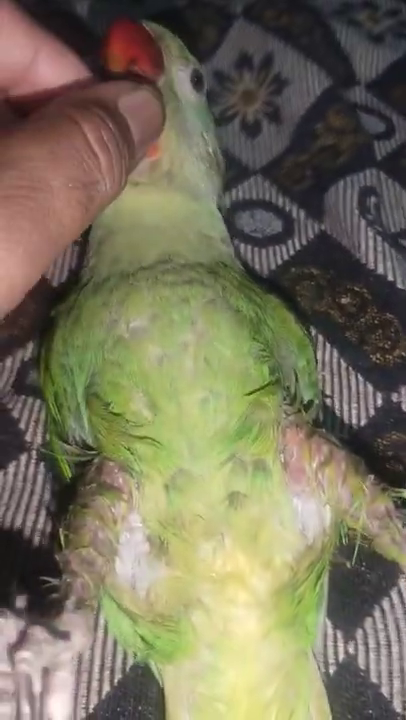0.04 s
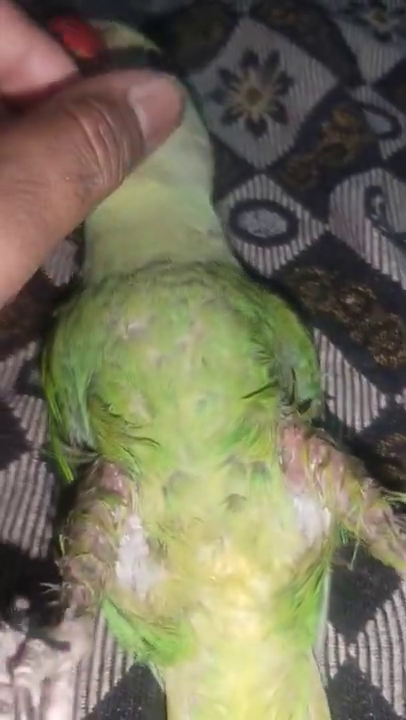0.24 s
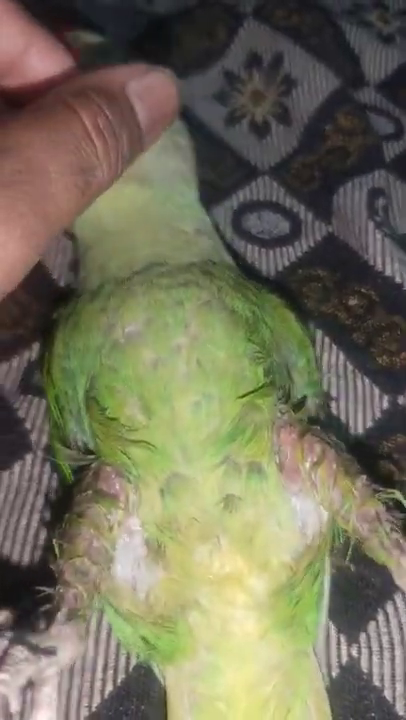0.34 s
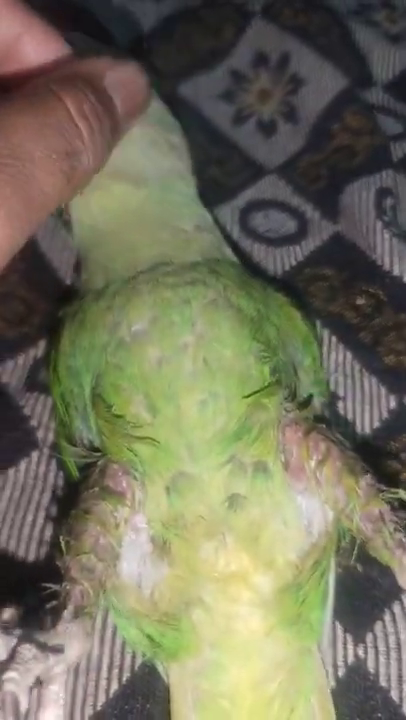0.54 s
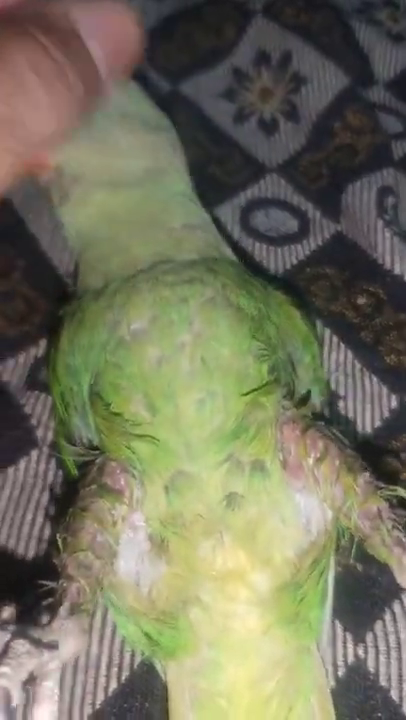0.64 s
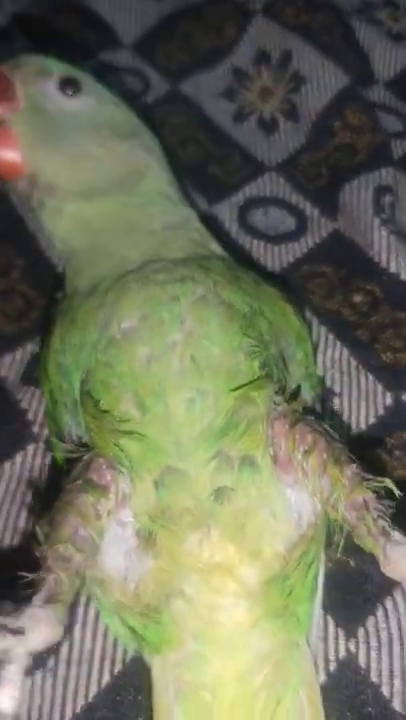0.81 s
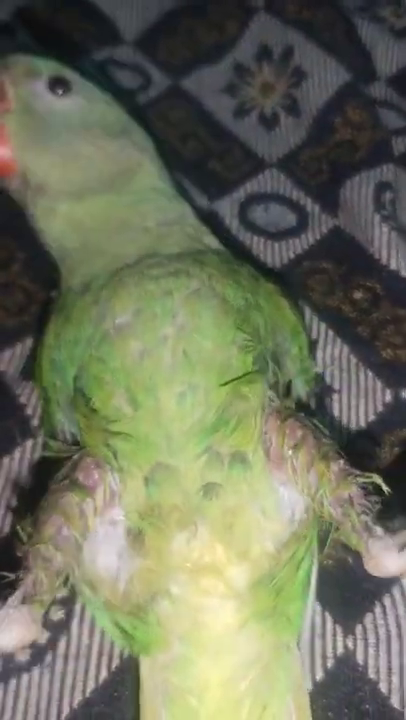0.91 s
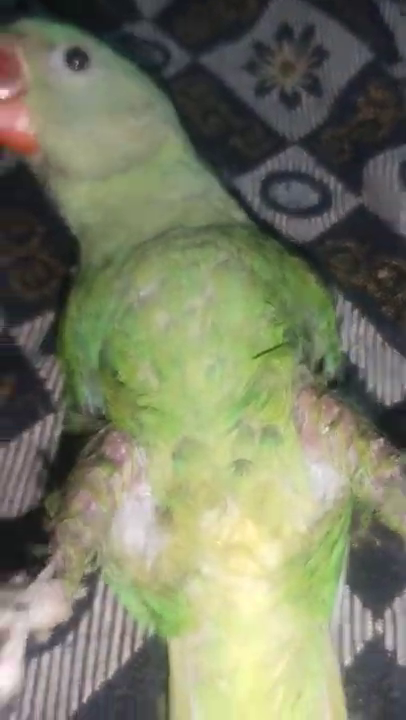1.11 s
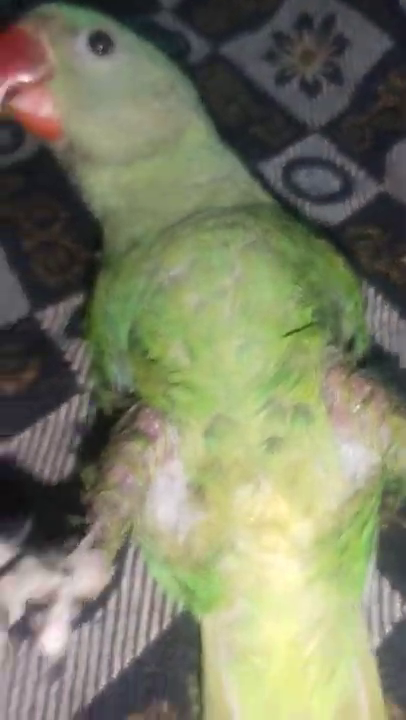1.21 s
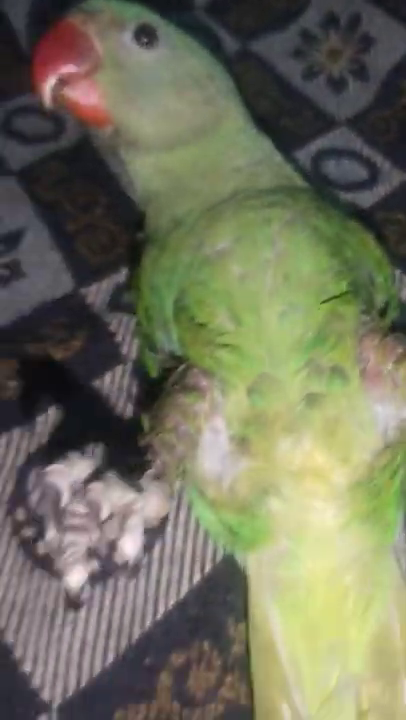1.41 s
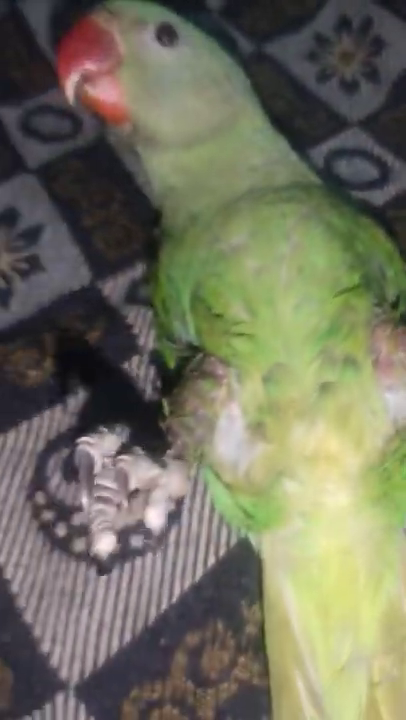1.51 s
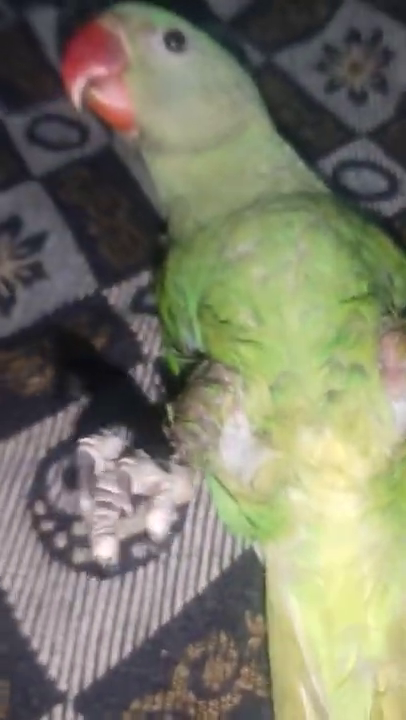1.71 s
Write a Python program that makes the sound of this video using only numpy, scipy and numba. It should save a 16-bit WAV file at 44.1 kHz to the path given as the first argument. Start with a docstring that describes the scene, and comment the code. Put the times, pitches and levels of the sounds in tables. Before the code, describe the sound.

A young parrot gives one harsh, high squawk that warbles rapidly and sinks slightly in pitch. It is close to the microphone in a small room, with low hum and soft handling bumps, and faint feather rustles afterwards.

```python
"""In a small room, a young parrot held close to a phone gives one harsh squawk.
Its syrinx is the source: a high tone that warbles about 27 times a second, sweeping its overtones
through the fixed resonances of the throat. Reflections from the room smear the sweeps.
Behind it lie rumble, a fan-like hum, soft handling bumps and, later, feather rustles and a faint whistle.
The phone's gain control turns them down along with the bird while the call lasts."""
import sys
import numpy as np
from scipy import signal
from scipy.fft import rfft, irfft
from scipy.io import wavfile
from scipy.ndimage import uniform_filter1d
from numba import njit

SR = 44100
rng = np.random.default_rng(int(sys.argv[2]) if len(sys.argv) > 2 else 0)


def log_audio(samples):
    """Write samples as a 16-bit WAV file to the path given in sys.argv[1]."""
    # one column per channel
    frames = np.atleast_2d(samples).T
    # limit to full scale, then quantise
    limited = np.clip(frames, -1, 1)
    pcm = np.round(limited * 32767).astype(np.int16)
    wavfile.write(sys.argv[1], SR, pcm)


N = 77175
TIME_S, FREQ_HZ = np.arange(N) / SR, np.fft.rfftfreq(N, 1 / SR)
SIDES = np.array([[1], [-1]])  # left, right

# spectrum of the background rumble and air: frequency_hz, relative_db
AIR_SPECTRUM = [(18, -76), (30, -39.5), (85, -5), (171, -3.5), (288, -12), (374, -6), (567, -13),
                (1270, -13), (1410, -25), (1870, -22), (2700, -33.5), (3070, -37), (3980, -34), (4310, -40),
                (15000, -63.5)]
# its stereo spread: frequency_hz, correlation, left_minus_right_db
AIR_SPREAD = [(62, 0.56, -17.5), (134, 0.45, -5), (300, 1, 3.5), (600, 0.091, 1.5), (1340, -0.52, 0.5),
              (3100, 0.31, 2), (8000, 0.12, 5)]
# bumps on the phone: centre_s, half_length_s, level_db
BUMPS = [(.06, 0.076, -42.5), (.28, 0.05, -35), (.38, 0.04, -32.5), (.56, 0.03, -30), (.65, 0.042, -34),
         (.8, 0.036, -29), (1.09, 0.032, -41.5), (1.47, 0.027, -43)]
# speed of the warble: time_s, rate_hz
WARBLE_RATE = [(.23, 23.54), (.29, 27.87), (.42, 27.8), (.6, 26.23), (.8, 25.76), (.92, 24.1)]
# top of the pitch swings: time_s, pitch_hz
CREST_PITCH = [(.21, 1940), (.25, 2262), (.281, 2388), (.288, 3170), (.298, 2900), (.309, 2322),
               (.317, 2391), (.323, 2932), (.332, 2900), (.348, 2334), (.395, 2273), (.5, 2087),
               (.77, 1840), (.89, 1655), (.94, 1561)]
# bottom of the pitch swings: time_s, pitch_hz
TROUGH_PITCH = [(.228, 1362), (.27, 1603), (.305, 1580), (.41, 1380), (.49, 1303), (.75, 1218), (.91, 1190),
                (.945, 1076)]
# skew of a swing (early ones rise slowly, late ones sink slowly): time_s, skew_rad
SWING_SKEW = [(.23, -0.098), (.31, -0.17), (.4, 0.076), (.6, .14), (.78, .2), (.9, 0.3024)]
# flatness of the crests: time_s, exponent
CREST_FLATNESS = [(.23, 0.86), (.28, 2.76), (.32, 2.9), (.36, 2.1), (.45, 1.6), (.55, 1), (.7, 1.08),
                  (.9, 0.97)]
# vocal effort: time_s, level_db
EFFORT = [(.215, -26.5), (.232, -25), (.243, -20), (.256, -25.5), (.264, -12), (.275, -9.5), (.286, -22),
          (.295, -3.5), (.311, -5.5), (.32, -9.5), (.328, 2.5), (.338, 2), (.42, 5), (.6, 3.5), (.76, 3.5),
          (.86, 1.3), (.94, -3.5)]
# loss of level on the upward sweeps: time_s, drop_db
RISE_SAG = [(.3, -1.5), (.55, 1), (.72, 3.5), (.8, 6), (.92, 2)]
# harmonics of the syrinx: multiple, level_db, phase_roughness_rad
HARMONICS = [(1, 4.76, .02), (2, -0.5, 0.02), (3, -7.5, 0.18), (4, -14.5, 0.26), (5, -13.5, .8),
             (6, -18.5, 0.55)]
# spectrum of the rasp at the syrinx: frequency_hz, relative_db
RASP_SPECTRUM = [(600, -38), (1150, -34), (1600, -7), (2500, -4.5), (4500, 8.5), (7000, 10.5), (9000, 4),
                 (11000, 9.5), (15000, 5)]
# strength of the open beak's shrill resonance: time_s, gain_db
BEAK_GAIN = [(.23, -33), (.6, -15), (.76, -22), (.86, 6), (.94, -5)]
# resonances of throat and beak at each microphone: frequency_hz, left_db, right_db
THROAT_RESPONSE = [(840, -37, -38), (1100, -13, -17), (1224, -17, -18.5), (1588, -15, -17),
                   (1857, -49, -5.5), (2050, -8, -6.5), (2290, -12.5, -0.5), (2310, -5.5, -2),
                   (2780, -5, -1.5), (3194, -10, -7), (3910, -7.5, 1.5), (4260, -10, -8), (4910, -8, -6),
                   (5900, -21, -12.5), (6380, -8.5, -8.5), (7560, -26.5, -15.5), (8050, -21.5, -41.5),
                   (8630, -37, -16.5), (11200, -37, -39), (15500, -27, -27.5)]
# feather rustles: centre_s, half_length_s, level_db
RUSTLES = [(1.3, 0.071, -48.5), (1.395, 0.023, -51.5), (1.66, .035, -53), (1.694, .006, -49.5)]
# their spectrum: frequency_hz, relative_db
RUSTLE_SPECTRUM = [(500, -16), (1000, 9.5), (2000, 2), (4000, -7), (7000, -11), (10000, -26), (15000, -25)]


def undb(db):
    """Decibels to amplitude ratio."""
    return 10 ** (np.asarray(db) / 20)


def curve(table):
    """Linear interpolation of (time_s, value) rows at every sample."""
    return np.interp(TIME_S, *np.array(table, float).T)


def spectrum(table, column=1):
    """One column of a table, interpolated over log frequency."""
    rows = np.array(table, float)
    return np.interp(np.log(FREQ_HZ + 1), np.log(rows[:, 0]), rows[:, column])


def band(centre_hz, half_width_hz, order=4):
    """Bell-shaped passband of peak gain 1."""
    return 1 / (1 + ((FREQ_HZ - centre_hz) / half_width_hz) ** order)


def unit(x):
    """Normalisation to rms 1."""
    return x / np.sqrt(np.mean(x ** 2))


def noise(gains):
    """White noise filtered by a gain at each frequency, at rms 1."""
    return unit(irfft(rfft(rng.standard_normal(N)) * gains, N))


def wander(hz):
    """Low-pass noise: a random drift mostly slower than hz."""
    return noise(band(0, hz))


def swells(table):
    """Gaussian envelopes from rows of centre_s, half_length_s, level_db."""
    return sum(undb(db) * np.exp(-((TIME_S - at) / half) ** 2) for at, half, db in table)


def air(level_db=-37, flicker_db=0.86):
    """Partial coherence: the sum and difference of two wavering noises spread rumble and air in stereo."""
    colour = undb(spectrum(AIR_SPECTRUM))
    mid, side = (rfft(noise(colour) * undb(flicker_db * wander(12.2))) for _ in range(2))
    correlation = np.clip(spectrum(AIR_SPREAD), -1, 1)
    pair = mid * np.sqrt(1 + correlation) + SIDES * side * np.sqrt(1 - correlation)
    balance = undb(SIDES * spectrum(AIR_SPREAD, column=2) / 2)
    return undb(level_db) * unit(irfft(pair * balance, N))


def hum(level_db=-46):
    """Narrow-band noise is heard as an unsteady pitch, like the hum of a fan."""
    return undb(level_db) * noise(band(centre_hz=367.8, half_width_hz=15.4, order=2))


def handling_bumps(left_minus_right_db=-14):
    """Structure-borne sound: soft bumps on the phone arrive as swells of low noise."""
    thud = np.array([noise(band(centre_hz=106, half_width_hz=52)) for _ in range(2)])
    return swells(BUMPS) * thud * undb(SIDES * left_minus_right_db / 2)


def warble_phase(first_dip_s=.2284):
    """Phase is the integral of rate; each whole turn falls on a dip of the pitch."""
    turns = np.cumsum(curve(WARBLE_RATE)) / SR
    return 2 * np.pi * (turns - turns[int(first_dip_s * SR)])


def warble_pitch(angle, squareness=1.05, jitter=.009, drift=0.00686):
    """Frequency modulation: the pitch swings between trough and crest, no two swings quite alike."""
    skewed = angle + curve(SWING_SKEW) * (1 - np.cos(angle))
    swing = np.tanh(squareness * np.cos(skewed)) / np.tanh(squareness)  # lingers at both ends
    depth = np.abs((1 + swing) / 2) ** curve(CREST_FLATNESS)
    hz = curve(CREST_PITCH) + (curve(TROUGH_PITCH) - curve(CREST_PITCH)) * depth
    return hz * (1 + jitter * wander(865) + drift * wander(60))


def syrinx(start_s=.214, end_s=.948, attack_s=.004, release_s=.0053, shimmer_db=0.28, rasp_db=-12):
    """Nearly periodic vibration gives a harmonic series, roughened by phase noise and a crackly rasp."""
    angle = warble_phase()
    hz = warble_pitch(angle)
    phase = 2 * np.pi * np.cumsum(hz) / SR
    gate = np.clip((TIME_S - start_s) / attack_s, 0, 1) * np.clip((end_s - TIME_S) / release_s, 0, 1)
    sag_db = curve(RISE_SAG) * np.maximum(np.sin(angle), 0) ** 2
    envelope = gate * undb(curve(EFFORT) - sag_db + shimmer_db * wander(865))
    fade_db = 0.16 * np.maximum(hz - 2066, 0)  # overtones fade as the pitch passes 2066 Hz
    tone = sum(undb(db - fade_db * (k > 1)) * np.sin(k * phase + roughness * wander(1300))
               for k, db, roughness in HARMONICS)
    crackle = undb(rasp_db + 3 * wander(300))  # flickers by 3 dB rms
    rasp = crackle * noise(undb(spectrum(RASP_SPECTRUM)))
    return envelope * (tone + rasp)


def vocal_tract(voice, left_lag_s=0.00027):
    """Source and filter: the throat shapes the voice, and a shrill resonance grows as the beak opens."""
    shrill = irfft(rfft(voice) * band(centre_hz=5000, half_width_hz=400), N)
    source = rfft(voice + undb(curve(BEAK_GAIN)) * shrill)
    delay = np.exp(-2j * np.pi * FREQ_HZ * left_lag_s)
    left = undb(spectrum(THROAT_RESPONSE, column=1)) * delay
    right = undb(spectrum(THROAT_RESPONSE, column=2))
    return irfft(source * np.array([left, right]), N)


def room(bird, early_db=-14.5, early_s=0.015, tail_db=-15.5, t60_s=0.43, treble_t60_s=0.39, gap_s=0.0047):
    """Reverberation: quick reflections from near surfaces, then a tail whose treble dies first."""
    hiss = rng.standard_normal((2, N))
    low = signal.sosfilt(signal.butter(2, 4000, fs=SR, output="sos"), hiss)
    tail = low * undb(-60 * TIME_S / t60_s) + (hiss - low) * undb(-60 * TIME_S / treble_t60_s)
    tail *= TIME_S > gap_s
    early = rng.standard_normal((2, N)) * TIME_S * np.exp(-2 * TIME_S / early_s)
    response = (undb(tail_db) * unit(tail) + undb(early_db) * unit(early)) / np.sqrt(N)
    return signal.fftconvolve(bird[1:], response, axes=1)[:, :N]  # the right channel drives both sides


def feather_rustles():
    """Friction noise: feathers brush on cloth in brief swells."""
    friction = np.array([noise(undb(spectrum(RUSTLE_SPECTRUM))) for _ in range(2)])
    return swells(RUSTLES) * friction


def whistle(centre_s=1.6, half_length_s=0.073, level_db=-61, pitch_hz=2740):
    """A sine tone with slight random frequency modulation is heard as a faint, brief high note."""
    hz = pitch_hz * (1 + 0.0098 * wander(117))
    return swells([(centre_s, half_length_s, level_db)]) * np.sin(2 * np.pi * np.cumsum(hz) / SR)


def scene():
    """Superposition: the bird, its reflections, the small noises and the background add."""
    bird = vocal_tract(syrinx())
    return bird + room(bird) + handling_bumps() + feather_rustles() + whistle() + air() + hum()


@njit
def follow(x, attack_s, release_s):
    """Envelope detection: a one-pole smoother with separate time constants for rise and fall."""
    out, level = np.empty(len(x)), 0.
    for i in range(len(x)):
        level += (x[i] - level) / (SR * (attack_s if x[i] > level else release_s))
        out[i] = level
    return out


def record(dry, threshold_db=-26, ratio=2.846, smooth_s=0.031, low_cut_hz=59, high_cut_hz=15700):
    """Compression turns everything down while the bird calls; filters cut the deepest bass and the top."""
    level = follow(np.sqrt(np.mean(dry ** 2, axis=0)), attack_s=0.0024, release_s=0.041)
    gain = np.maximum(level / undb(threshold_db), 1) ** (1 / ratio - 1)
    gain = uniform_filter1d(gain, int(smooth_s * SR) + 1)
    out = signal.sosfilt(signal.butter(2, low_cut_hz, "high", fs=SR, output="sos"), dry * gain)
    return signal.sosfilt(signal.ellip(8, .2, 70, high_cut_hz, fs=SR, output="sos"), out)


dry = scene()
out = record(dry)
log_audio(out)
```